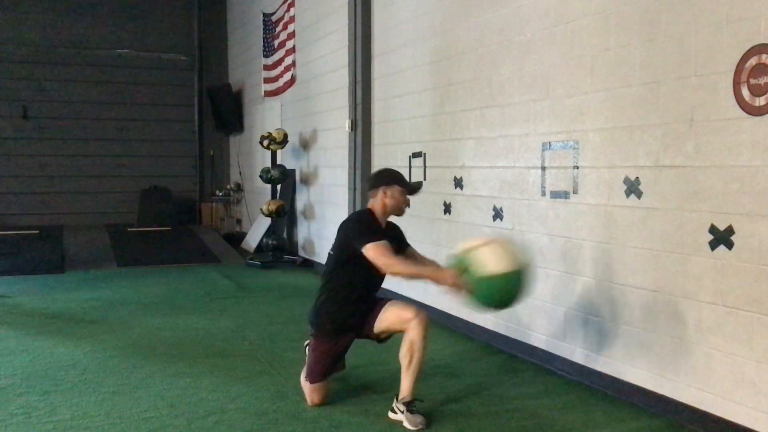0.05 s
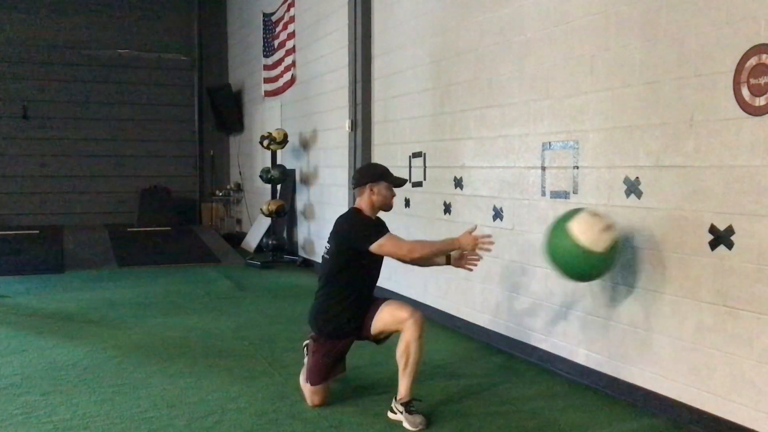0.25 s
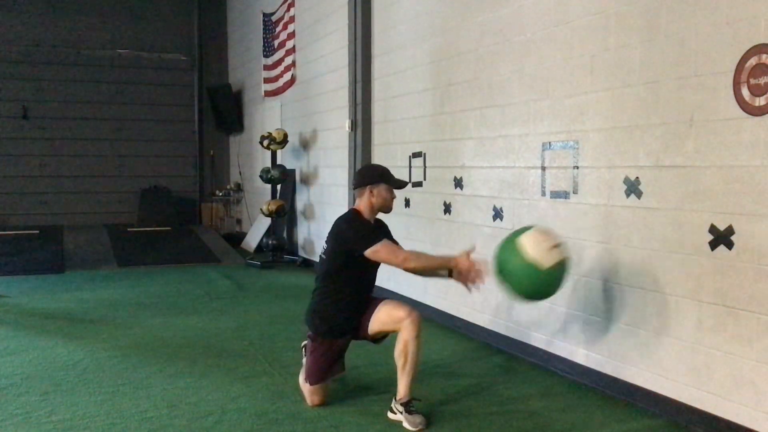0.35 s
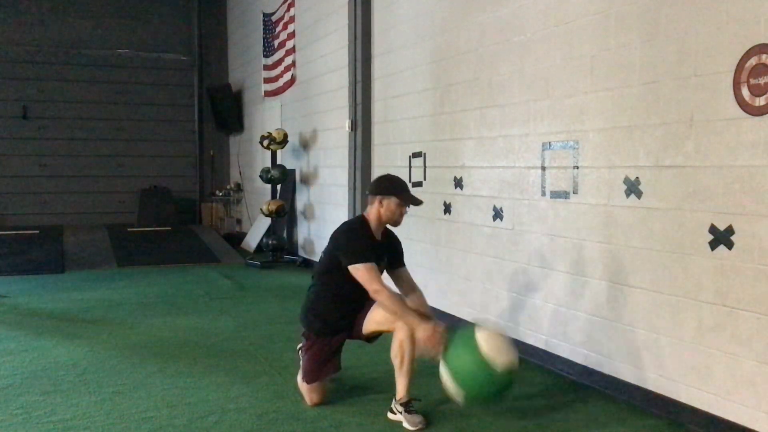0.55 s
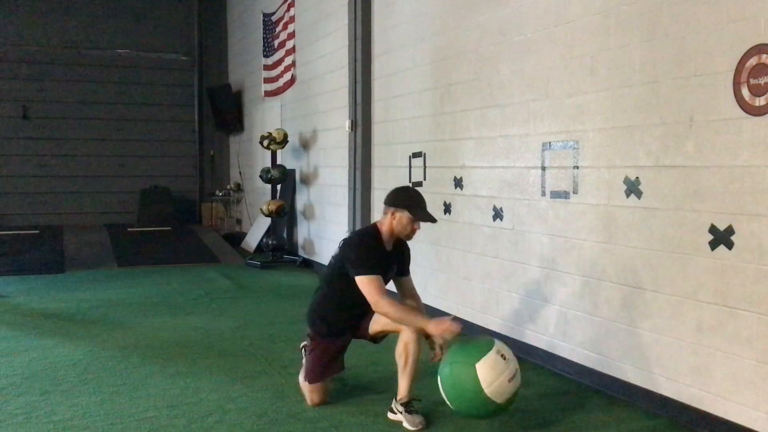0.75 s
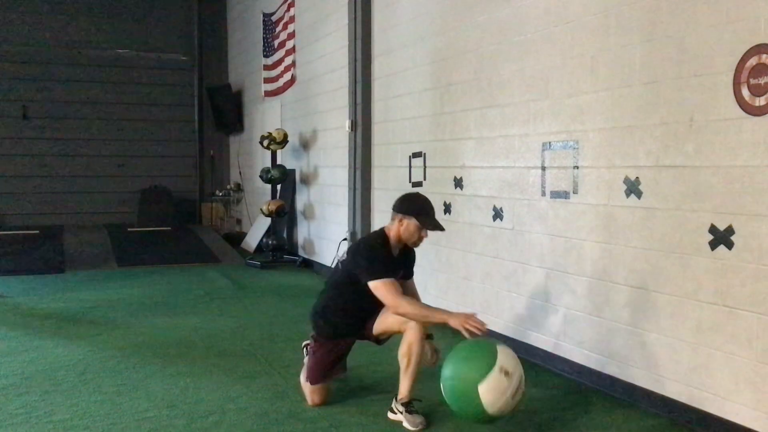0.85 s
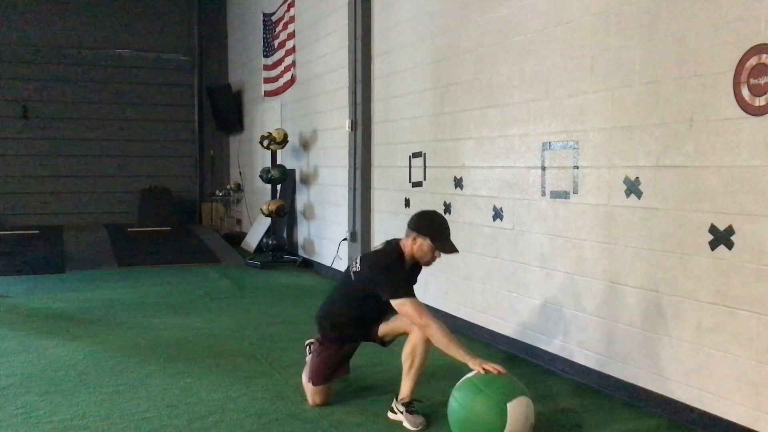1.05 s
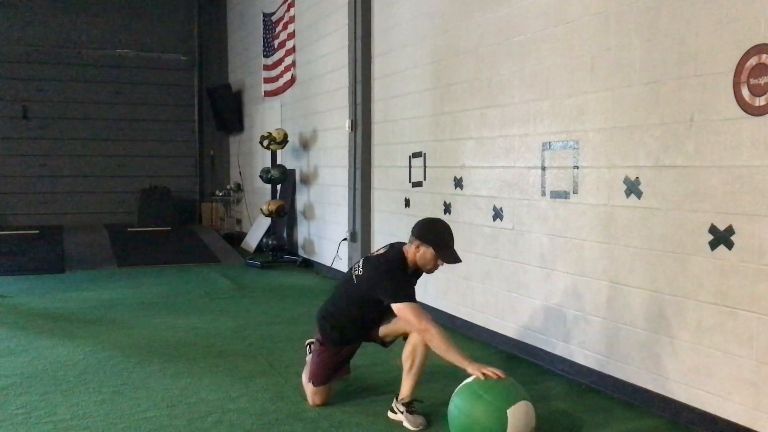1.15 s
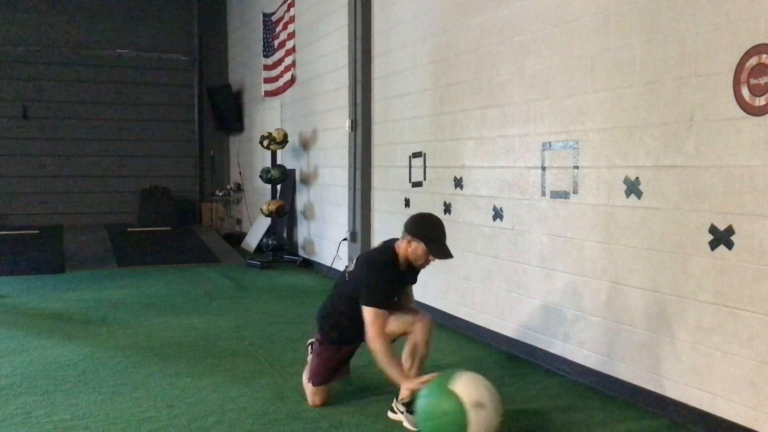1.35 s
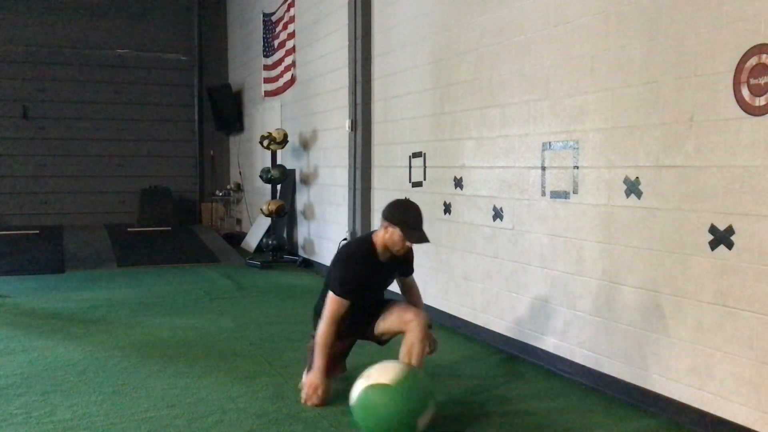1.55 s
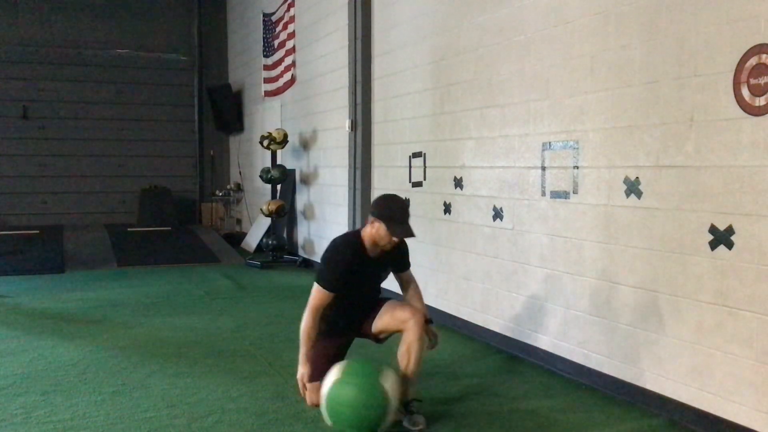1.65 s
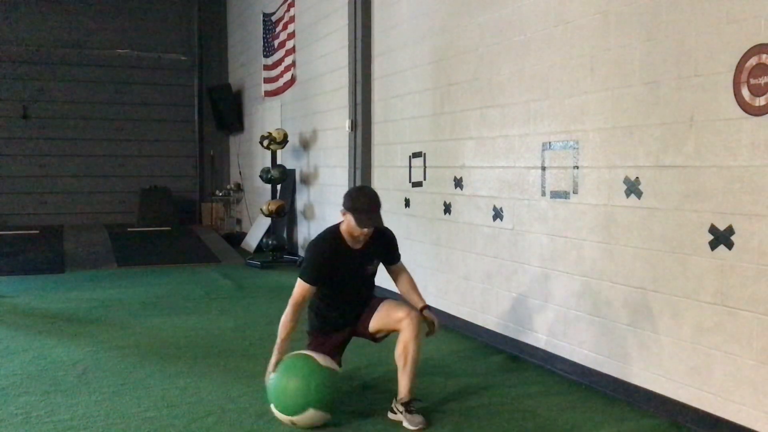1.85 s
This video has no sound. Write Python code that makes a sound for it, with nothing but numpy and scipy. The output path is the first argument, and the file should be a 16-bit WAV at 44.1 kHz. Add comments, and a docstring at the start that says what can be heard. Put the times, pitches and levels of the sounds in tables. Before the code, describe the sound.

A heavy medicine ball slams against a wall in an echoing gym, then bumps softly.

```python
"""A heavy medicine ball is thrown against a block wall in a large gym, caught, set down and nudged.
On each hit its skin cracks and slaps, its body rings briefly and its filling thuds just after.
Nearby surfaces echo and the hall rings on, at first still carrying the throw before.
The ball rumbles as it rolls on the turf; clothes and turf rustle faintly over the ventilation's hum."""
import sys
import numpy as np
from scipy import signal
from scipy.fft import rfft, irfft
from scipy.io import wavfile

SR = 44100
rng = np.random.default_rng(int(sys.argv[2]) if len(sys.argv) > 2 else 0)


def unload_audio(sound):
    """Save the sound as a 16-bit wav file, at the path given as the first command line argument."""
    columns = np.transpose(np.atleast_2d(sound))
    # keep every value between -1 and 1, then stretch to whole-number steps
    steps = np.round(np.clip(columns, -1, 1) * 32767)
    wavfile.write(sys.argv[1], SR, steps.astype(np.int16))


N = 83790


def undb(db):
    return 10 ** (np.asarray(db) / 20)


def unit_rms(x):
    return x / np.sqrt(np.mean(x ** 2))


def curve_at(hz, table, column=1):
    """Read a table column on a log-frequency axis."""
    rows = np.array(table, float)
    return np.interp(np.log(np.maximum(hz, 1)), np.log(rows[:, 0]), rows[:, column])


def noise(colour):
    """Noise shaped by an EQ curve, at rms 1."""
    gain = undb(curve_at(np.fft.rfftfreq(N, 1 / SR), colour))
    return unit_rms(irfft(rfft(rng.standard_normal(N)) * gain, N))


def lowpass(x, hz):
    """A gentle one-pole treble roll-off."""
    pole = np.exp(-2 * np.pi * hz / SR)
    return signal.lfilter([1 - pole], [1, -pole], x)


def wander(step_s):
    """Glide to a new random value every step, with a spread near 1."""
    return np.interp(np.arange(N) / SR / step_s, np.arange(N), rng.standard_normal(N))


def since(start_s):
    """Seconds since a moment, zero before it."""
    return np.maximum(np.arange(N) / SR - start_s, 0)


def delay(x, lag_s):
    return np.pad(x, (round(lag_s * SR), 0))[:N]


# Colour of the rushing air: freq_hz, gain_db
AIR_COLOUR = [(25, -36.5), (45, -12.5), (80, -8), (140, -2), (200, -8), (300, -14.5), (450, -21),
              (800, -28.5), (1500, -33), (3000, -38.5), (7000, -49.5), (15000, -52.5)]
# Fan tones: pitch_hz, level_db
FAN_TONES = [(139, -58.5), (598, -80)]

def ventilation():
    """A bed of low rushing air, with fan tones that waver in level and phase."""
    t = since(0)
    hum = 0
    for pitch_hz, level_db in FAN_TONES:
        amplitude = np.sqrt(2) * undb(level_db + 2 * wander(step_s=0.15))
        hum += amplitude * np.sin(2 * np.pi * pitch_hz * t + 0.3 * wander(step_s=0.15))
    return hum + undb(-58.5) * noise(AIR_COLOUR)


# Colour of the rubbing: freq_hz, gain_db
RUSTLE_COLOUR = [(200, -18), (700, -25), (1800, 0.5), (4000, 2), (7000, -4), (10000, 0.5), (15000, -1.5)]
# Moves of clothes, hands and turf: peak_s, width_s, level_db, lowpass_hz
RUSTLE_CUES = [(0.03, .02, -70, 2000), (0.112, 0.038, -65.5, 12200), (0.498, .02, -69, 12000),
               (0.612, 0.038, -73, 12000), (0.682, 0.016, -65, 7000), (1.057, 0.02, -74.5, 14000),
               (1.076, 0.0016, -63, 14400), (1.11, 0.016, -70, 14000), (1.156, 0.017, -69.5, 7000),
               (1.39, 0.023, -89.5, 12000), (1.507, 0.0027, -71.5, 12000), (1.816, 0.017, -70, 12000),
               (1.896, 0.051, -67, 12100)]

def rustles():
    """Cloth and turf rub in soft, grainy swells."""
    t = since(0)
    grain = unit_rms(noise(RUSTLE_COLOUR) * undb(2.5 * wander(step_s=0.003)))
    out = 0
    for peak_s, width_s, level_db, lowpass_hz in RUSTLE_CUES:
        swell = np.exp(-((t - peak_s) / width_s) ** 2 / 2)
        out += undb(level_db) * swell * lowpass(grain, lowpass_hz)
    return out


# Colour and decay of the gym's reverb: freq_hz, gain_db, t60_s
HALL_REVERB = [(30, -20.5, 1.3), (58, -1.5, 6.6), (95, -2.5, 3), (130, 0.5, 3), (177, -3.5, 3.2),
               (268.6, 0, 2.04), (403, -7.5, 2.5), (490, -4.5, 2.18), (620, -11.5, 2.9), (820, -16.5, 2.3),
               (980, -15.5, 2.08), (1440, -13, 2.46), (2230, -20, 2.04), (3350, -21.5, 1.88),
               (4352, -19, 1.67), (6400, -25.5, 0.97), (9895, -29.5, .76), (15200, -36, .62)]

def hall_tail(start_s):
    """The diffuse wash after a hit, in half-octave bands; the treble dies first."""
    predelay_s, build_s = 0.014, 0.013
    t = since(start_s + predelay_s)
    octave = np.log2(np.fft.rfftfreq(N, 1 / SR) + 1)
    spectrum = rfft(noise(HALL_REVERB))
    wash = 0
    for centre_hz in 31.25 * 2 ** (np.arange(19) / 2):
        band_gain = np.maximum(1 - 2 * np.abs(octave - np.log2(centre_hz)), 0)
        t60_s = curve_at(centre_hz, HALL_REVERB, column=2)
        wash += irfft(spectrum * band_gain, N) * undb(-60 * t / t60_s)
    return undb(-33.5) * wash * (1 - np.exp(-t / build_s))


def earlier_throw():
    """The throw before dies away in the hall, with one room resonance lingering."""
    pitch_hz, t60_s = 446, 2.6
    t = since(0)
    fade = undb(-61 - 60 * t / t60_s + 2 * wander(step_s=0.04))
    resonance = fade * np.sin(2 * np.pi * pitch_hz * t + 0.67 * wander(step_s=0.034))
    return resonance + undb(-6) * hall_tail(start_s=-0.74)


def roll():
    """The filling rumbles, low and uneven, as the ball rolls over the turf."""
    peak_s, width_s, pitch_hz = 1.15, 0.097, 62
    t = since(0)
    swell = undb(-52.5 + 3 * wander(step_s=0.08)) * np.exp(-((t - peak_s) / width_s) ** 2 / 2)
    return swell * np.sin(2 * np.pi * pitch_hz * t + wander(step_s=0.05))


def filling_thud():
    """The low end of a hit: the filling piles up a moment after the skin stops."""
    pitch_hz, lag_s, rise_s = 62.76, 0.015, 0.015
    t = since(lag_s)
    swell = (t / rise_s * np.exp(1 - t / rise_s)) ** 2
    return undb(-21.5) * swell * -np.sin(2 * np.pi * pitch_hz * t)


# Modes of the ball's body: pitch_hz, level_db, t60_s, attack_s
BODY_MODES = [(112, -8, 0.032, 0.0034), (271, -7.5, 0.04, 0.0048), (528, -17.5, 0.042, 0.0021),
              (667, -9.5, 0.026, 0.0031), (1632, -22, 0.015, 0.00039), (1803, -28, 0.032, 0.0027),
              (3590, -26, 0.012, .0005), (4360, -26, 0.018, 0.001)]

def body_ring():
    """Just behind the skin, the body's modes swell as the ball flattens, then die quickly."""
    t = since(0.00142)
    ring = 0
    for pitch_hz, level_db, t60_s, attack_s in BODY_MODES:
        envelope = undb(level_db - 60 * t / t60_s) * (1 - np.exp(-(t / attack_s) ** 2))
        ring -= envelope * np.sin(2 * np.pi * pitch_hz * t)
    return ring


# Colour of the skin's first crack: freq_hz, gain_db
CRACK_COLOUR = [(200, -8.5), (700, -2.5), (1600, 0.5), (2200, -5.5), (3400, -0.5), (4500, -4.5),
                (5500, -15), (7000, -24), (10000, -18.5), (15000, -23)]

def skin_crack(size=2048):
    """The front edge of a hit: the skin meets the surface in two quick touches."""
    gain = undb(curve_at(np.fft.rfftfreq(size, 1 / SR), CRACK_COLOUR))
    cepstrum = irfft(np.log(gain))
    pulse = irfft(np.exp(rfft(2 * cepstrum[:size // 2], size)))  # minimum phase: a sharp attack
    touch = np.pad(pulse / np.linalg.norm(pulse), (0, N - size))
    return touch + undb(2) * delay(touch, lag_s=0.00117)


def skin_slap(crackle, start_s, hold_s):
    """The skin crackles as it spreads over the surface: a short hold, then a fast release."""
    release_s = 0.0052
    release = np.exp(-np.minimum(since(start_s + hold_s) / release_s, 20))
    return undb(-20.5) * crackle * (since(start_s) > 0) * release


# Early reflections: delay_s, body_db, slap_db
REFLECTIONS = [(0.0238, -21, -11.5), (.031, -19.5, -22.5), (.035, -17, -10.5), (.064, -32, -17),
               (0.076, -24, -9.5)]

def early_echoes(ring, crackle, hold_s):
    """Nearby surfaces throw back the ring and the slap, slightly darkened."""
    echoes = 0
    for delay_s, body_db, slap_db in REFLECTIONS:
        echoes += undb(body_db) * delay(ring, delay_s)
        echoes += undb(slap_db) * skin_slap(crackle, delay_s, hold_s)
    return lowpass(echoes, hz=12000)


def contact_tone(x, low_cut_hz, high_cut_hz):
    """A light contact loses bass, a soft one loses treble."""
    band = signal.butter(2, [low_cut_hz, high_cut_hz], "bandpass", fs=SR, output="sos")
    return signal.sosfilt(band, x)


# Colour of the skin's slap: freq_hz, gain_db
SLAP_COLOUR = [(200, -8.5), (900, 2), (1750, 2), (2150, -2), (2500, -7), (2850, -15), (3400, 5.5),
               (3900, -17), (4400, -0.5), (5800, -12.5), (9000, -14), (15000, -11.5)]
# Wall hit, catch, set-down and nudge; level_db is the fader over each hit's layers:
# start_s, level_db, skin_db, hold_s, thud_db, low_cut_hz, high_cut_hz, hall_db, body_db
BALL_HITS = [(0.2327, 0, -5.5, 0.0023, -6, 24.4, 14700, -0.5, -0.5),
             (0.668, -10.5, 4.5, 0.0086, -9.5, 152, 538, -4, -3.5),
             (1.028, -14.5, 2.5, 0.008, -7.5, 244, 417, -4.5, 0),
             (1.504, -31.5, -4, 0.0035, -18, 201, 685, -10.5, -1)]

def medicine_ball():
    """Each hit layers skin, body and filling with early echoes and the hall's tail."""
    ring, crack, thud = body_ring(), skin_crack(), filling_thud()
    tail, crackle = hall_tail(start_s=0), noise(SLAP_COLOUR)
    out = 0
    for start_s, level_db, skin_db, hold_s, thud_db, *cuts_hz, hall_db, body_db in BALL_HITS:
        body = undb(body_db) * ring
        skin = undb(skin_db) * (crack + skin_slap(crackle, 0, hold_s))
        room = early_echoes(body, undb(skin_db) * crackle, hold_s) + undb(hall_db) * tail
        hit = contact_tone(body + skin + room, *cuts_hz) + undb(thud_db) * thud
        out += undb(level_db) * delay(hit, start_s)
    return out


def scene():
    """The ball up front, rustles and ventilation behind it, in mono."""
    return (medicine_ball() + earlier_throw() + roll() + rustles() + ventilation())[None]


def record(dry):
    """The microphone thins the deepest bass and the recorder cuts the top."""
    low_cut_hz, high_cut_hz = 31.4, 15700
    low_cut = signal.butter(2, low_cut_hz, "highpass", fs=SR, output="sos")
    high_cut = signal.ellip(10, 0.2, 70, high_cut_hz, fs=SR, output="sos")
    return signal.sosfilt(high_cut, signal.sosfilt(low_cut, dry))


dry = scene()
out = record(dry)
unload_audio(out)
```